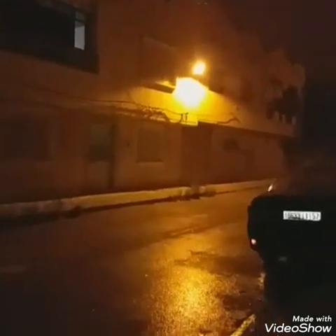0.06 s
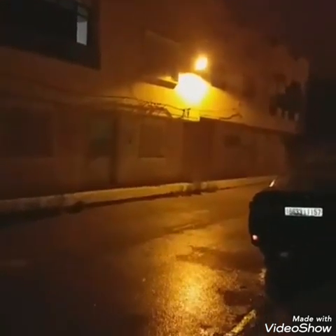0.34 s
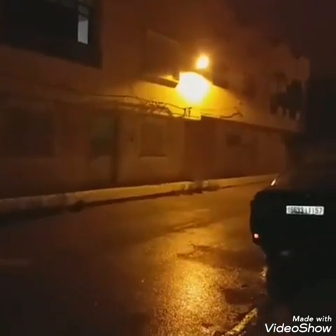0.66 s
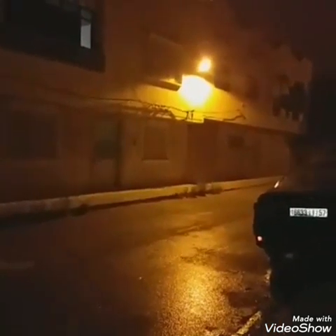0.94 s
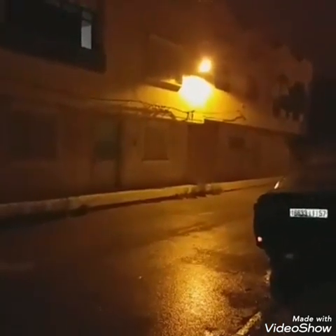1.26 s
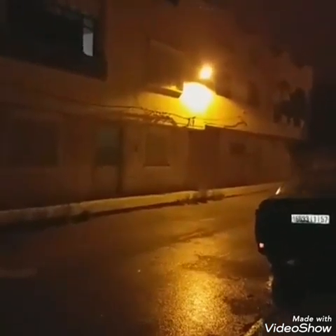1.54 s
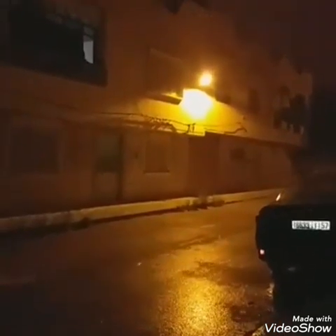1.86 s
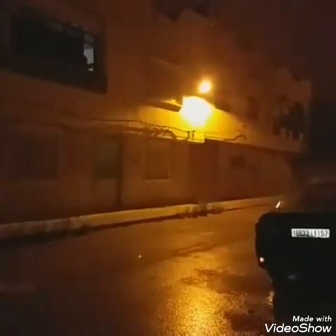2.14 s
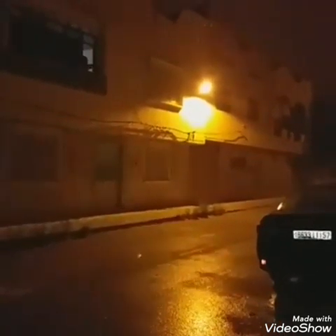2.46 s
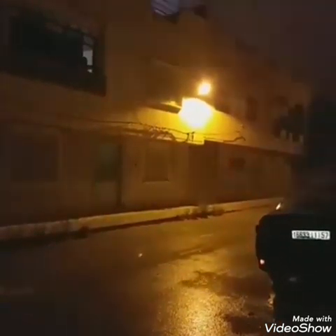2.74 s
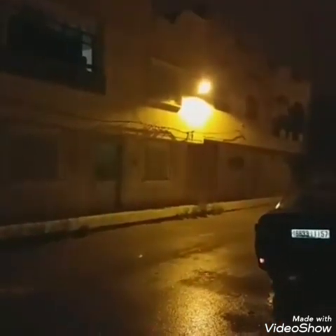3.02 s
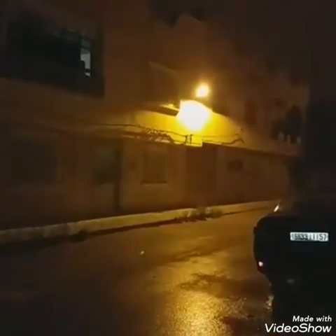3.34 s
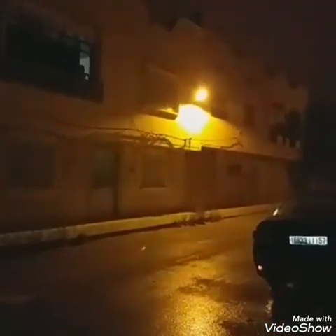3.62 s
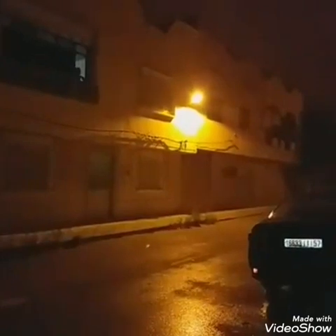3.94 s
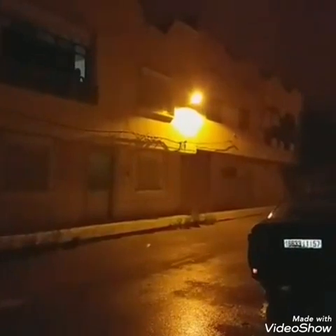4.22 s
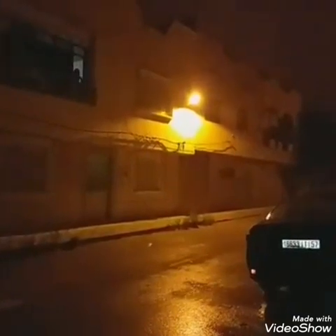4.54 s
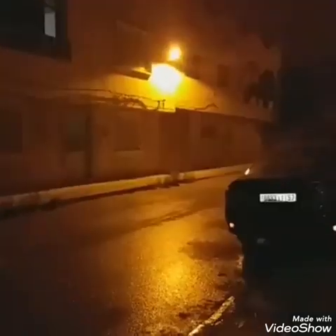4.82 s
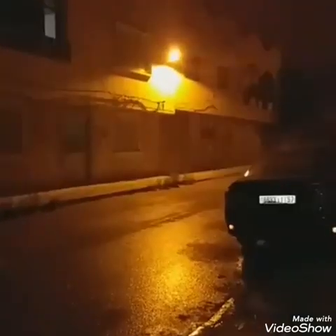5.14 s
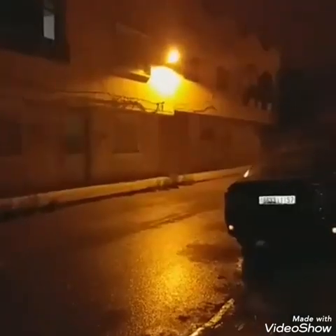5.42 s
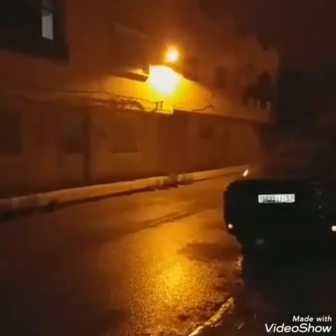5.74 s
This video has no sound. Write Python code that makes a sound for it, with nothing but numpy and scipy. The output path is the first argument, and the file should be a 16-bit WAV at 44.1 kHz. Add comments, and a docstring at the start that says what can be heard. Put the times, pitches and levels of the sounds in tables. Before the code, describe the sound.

A steady downpour on a narrow street, close drips splashing over a low distant rumble, with one brief cut-out near the end.

```python
"""Heavy rain on a narrow street at night, heard from the kerb.
Near drops patter, and fat drips smack, throw spray and plop into puddles, where air bubbles ring.
Countless far drops merge into a wash, water drums on roofs, and distant thunder rolls underneath.
Late on a dull rush swells, the sound cuts out for a moment, then comes back softer with a bright tick."""
import sys
import numpy as np
from scipy import signal
from scipy.fft import rfft, irfft, next_fast_len
from scipy.io import wavfile

SR = 44100
rng = np.random.default_rng(int(sys.argv[2]) if len(sys.argv) > 2 else 0)


def persist_wave(psi):
    """Save psi, clipped to +-1, as 16-bit WAV."""
    counts = np.round(np.clip(psi, -1, 1) * 32767).astype(np.int16)
    wavfile.write(sys.argv[1], SR, np.atleast_2d(counts).T)


N = 254898
TIME = np.arange(N) / SR

# the bright tone of fine spray and ticks: (frequency [Hz], level [dB])
BRIGHT_TONE = [(1500, -10), (4000, 1), (8500, 8.5), (10200, 6.5), (12800, 10), (15800, 0.5)]


def patter():
    """Near raindrops land with sharp ticks and tiny rings over the hiss of their droplets."""
    # the tone of near drops: (frequency [Hz], level [dB])
    patter_tone = [(1200, -27), (2500, -5), (3400, -7.5), (4200, -1.5), (5250, 1), (6200, -0.5), (7400, 1),
                   (8900, -2.5), (9800, -10.5), (10800, -9.5), (11400, -3), (12600, -2), (14000, -6),
                   (15800, -10.5)]
    ticks = undb(-6) * impacts(per_second=2200, scatter_db=2.8, width=.1)
    pings = undb(-7) * ringing_drops(hz=5900, octaves=.48, fade_s=.009, count=3200, scatter_db=3.7)
    # each landing throws up droplets that soon fall back
    landings = np.abs(impacts(per_second=99, scatter_db=3.5, width=0)[0]) ** 2
    settle_s = .018
    droplets = np.sqrt(signal.lfilter([1], [1, -np.exp(-1 / (settle_s * SR))], landings))
    hiss = stereo_noise(side_db=-17) * np.hypot(1, undb(-3) * unit(droplets))
    return shape_tone(hiss + ticks + pings, patter_tone) * undb(wander(45))


def flurries():
    """A changing gain that makes the near rain thicken and thin in short, smooth waves."""
    # flurries (+) and lulls (-): (middle time [s], level change [dB], half length [s])
    waves = [(.12, -2.5, .1), (0.43, -3.5, 0.022), (0.634, -1, 0.055), (1.608, -2.5, .03),
             (1.875, -1, 0.027), (2.06, 1, .025), (2.26, 0.5, 0.029), (2.467, -1, 0.026),
             (2.684, -4.5, .025), (2.81, -2.5, .02), (2.893, 1.5, .03), (3.15, 1, .035),
             (3.388, -4.5, 0.066), (3.568, -3, 0.027), (3.723, -1, 0.032), (3.92, 0.5, .025),
             (4.127, -2.5, 0.13), (4.252, 2, 0.018), (4.5, 2, .09)]
    return undb(sum(db * np.exp(-((TIME - s) / half_length) ** 2) for s, db, half_length in waves))


def spatter():
    """Stray drops of very different sizes tick on the pavement."""
    return undb(-23) * ringing_drops(hz=5600, octaves=.38, fade_s=.0062, count=110, scatter_db=7)


def stray_spray():
    """Small drops shatter all around, each with a fine tick and a puff of mist."""
    ticks = impacts(per_second=45, scatter_db=2.1, width=.15)
    return undb(-12) * shape_tone(add_tail(ticks, fade_s=.03, tail_db=7), BRIGHT_TONE)


def drips():
    """Each fat drip lands with a tick and smacks with a brief ring; its droplets hiss a little longer."""
    # fat drips landing close by: (time [s], level [dB], ring pitch [Hz])
    landings = [(0.0313, -19, 5800), (0.087, -18.5, 5440), (0.228, -17.5, 5400), (0.2788, -14.5, 4870),
                (0.282, -17, 5740), (0.335, -16, 7400), (0.386, -23, 5200), (0.8974, -18, 6250),
                (0.981, -11, 7900), (1.0693, -19.5, 5360), (1.1573, -22, 7300), (1.215, -15.5, 7100),
                (1.553, -10.5, 4850), (1.5618, -22, 4890), (1.569, -18, 5240), (1.6681, -13, 6800),
                (1.7449, -24, 4300), (1.8194, -11.5, 7050), (1.9909, -13.5, 7060), (2.2079, -20, 7660),
                (2.299, -22, 5500), (2.309, -18, 5300), (2.5082, -21, 7800), (2.7013, -19.5, 6900),
                (2.8717, -21.5, 4550), (2.903, -20, 5630), (2.9114, -21.5, 5470), (3.022, -22, 6390),
                (3.123, -18, 7950), (3.485, -24, 4400), (3.511, -15.5, 4940), (3.774, -16.5, 5080),
                (3.8734, -19, 5600), (3.8901, -18, 6100), (3.9033, -17, 6400), (3.921, -14.5, 7200),
                (4.129, -23, 5600), (4.2233, -18, 6560), (4.284, -18, 7170), (4.3137, -10.5, 4950),
                (4.3231, -13, 5450), (4.3295, -23, 4630), (4.34, -19, 5000), (4.4593, -22, 5040),
                (4.561, -19, 5300), (4.668, -18, 5200), (5.2786, -15, 5500), (5.2855, -20, 4500),
                (5.2925, -22, 5000), (5.403, -21, 5330), (5.604, -20, 6260)]
    ring_s, smack_s, droplets_s, flatten_s = .0048, .004, .075, .0003
    out, t = np.zeros((2, N)), TIME[:SR // 12]
    for s, db, hz in landings:
        burst_noise, droplet_noise, tick_noise = rng.standard_normal((3, len(t)))
        ring = np.sin(2 * np.pi * hz * t) * fade(t, ring_s)
        tick = undb(-14) * tick_noise * fade(t, smack_s)
        burst = burst_noise * fade(t, smack_s)
        droplets = undb(-20) * droplet_noise * fade(t, droplets_s)
        around_ring = signal.butter(2, [hz * .57, hz * 1.26], "band", fs=SR)
        smack = ring + tick + undb(-1) * signal.lfilter(*around_ring, burst + droplets)
        smack *= 1 - np.exp(-t / flatten_s)  # the sound builds as the drop flattens
        smack *= undb(db) / np.abs(smack).max()
        place(out, s + .001194, smack, pan=.033 * rng.standard_normal())
        # the nearest wall returns it as a quick slap
        place(out, s + .0096, undb(-14) * smack, pan=.1 * rng.standard_normal())
    return out


def splashes():
    """The heaviest drips throw up a crown of water that falls back with a soft, wet splat."""
    # wet splats: (time [s], level [dB], length [s])
    splats = [(1.0, -40, .012), (1.54, -35, .02), (1.985, -35, .014), (2.297, -37, .012),
              (3.49, -37, 0.018), (3.885, -37, 0.028), (4.316, -29.5, 0.014), (5.28, -35, .011)]
    # the tone of a splat: (frequency [Hz], level [dB])
    splat_tone = [(900, -22), (2000, -7), (3300, -3.5), (4800, 2), (7000, -3.5), (9000, -7), (15000, -24.5)]
    falling_water = impacts(per_second=6000, scatter_db=-1.5, width=.1)
    return bursts(splats) * shape_tone(falling_water, splat_tone)


def plops():
    """Big drips fall into the nearest puddles: a bubble rings very briefly inside a hollow splash."""
    # drips into puddles: (time [s], level [dB], bubble pitch [Hz])
    puddle_drips = [(0.1078, -25, 1830), (0.155, -27, 1940), (0.553, -24.5, 1710), (1.06, -25, 1110),
                    (2.289, -22.5, 1940), (2.3018, -22, 1960), (2.5242, -24, 1920), (4.314, -30, 2180),
                    (4.323, -28, 2250), (5.354, -25, 2180), (5.4632, -24, 1920)]
    rise_s, ring_s = .0012, .012
    out, t = np.zeros((2, N)), TIME[:int(ring_s * SR)]
    envelope = (1 - np.exp(-(t / rise_s) ** 2)) * fade(t, ring_s)
    for s, db, hz in puddle_drips:
        around_bubble = signal.butter(2, [hz * .75, hz * 1.4], "band", fs=SR)
        splash = unit(signal.lfilter(*around_bubble, rng.standard_normal(SR // 10)))[:len(t)]
        plop = (np.sin(2 * np.pi * hz * t) + undb(-10) * splash) * envelope
        place(out, s, undb(db) * plop / np.abs(plop).max(), pan=.22 * rng.standard_normal())
    return out


def sprays_and_tick():
    """Bright bursts: spray from shattered drips, and one brief tick as the sound cuts back in."""
    # bright bursts (the one at 4.89 s is the tick after the gap): (time [s], level [dB], length [s])
    bright_bursts = [(0.185, -26, 0.016), (0.458, -27, 0.006), (0.517, -25.5, 0.014), (0.73, -27.5, 0.043),
                     (0.793, -24.5, 0.05), (0.839, -20.5, 0.02), (0.943, -23, 0.016), (1.538, -23, 0.02),
                     (1.559, -26.5, 0.014), (1.785, -24, 0.018), (2.501, -24, 0.012), (3.022, -28.5, 0.012),
                     (3.119, -30, 0.012), (3.232, -27.5, 0.012), (3.363, -30, 0.011), (3.479, -27.5, 0.014),
                     (3.504, -22, 0.021), (3.692, -27, 0.018), (3.772, -25, 0.011), (4.371, -30, 0.01),
                     (4.455, -28, 0.011), (4.89, -29, 0.022), (5.276, -24, 0.0055), (5.611, -24, 0.011)]
    fizz = impacts(per_second=4900, scatter_db=1, width=.11)
    return undb(-6.5) * bursts(bright_bursts) * shape_tone(fizz, BRIGHT_TONE)


def wash():
    """Rain all down the street merges into a smooth rush with a faint grain of drops on stone."""
    # the tone of far rain: (frequency [Hz], level [dB])
    wash_tone = [(300, -33), (600, -11.5), (810, -10.5), (880, -3.5), (980, -4), (1120, 1), (1280, -2),
                 (1480, -3), (1900, 0.5), (2300, -3), (2800, -5), (4000, -6.5), (6000, -12.5),
                 (9000, -17.5), (16000, -32)]
    rush = stereo_noise(side_db=-25)
    grain = undb(-5) * impacts(per_second=900, scatter_db=2.5, width=.027)
    return shape_tone(rush + grain, wash_tone) * undb(.5 * wander(12))


def puddles():
    """Bubbles of about one size plink all over the wet street."""
    return undb(-7) * ringing_drops(hz=1954, octaves=.203, fade_s=.06, count=900, scatter_db=1)


def roofs():
    """Water drums on roofs and runs in gutters, dull and restless."""
    # the low tone of roofs and gutters: (frequency [Hz], level [dB])
    roof_tone = [(30, -41), (90, -13), (140, -7), (185, 1), (235, -2), (290, 0), (340, -0.5), (410, 1.5),
                 (470, 0.5), (520, 2), (620, -3), (900, -6), (3000, -38.5)]
    return shape_tone(stereo_noise(side_db=-27), roof_tone) * undb(1.6 * wander(20))


def thunder():
    """Far thunder rolls unevenly, dulled by distance, with a few stronger thumps of air pressure."""
    # rolls that swell fast and die slowly: (peak time [s], level [dB], dying time [s])
    rolls = [(.85, -58, .4), (1.4, -63, 0.33), (2.23, -51, 0.45), (2.85, -51, 0.5), (3.25, -50, 0.69),
             (3.78, -46.5, 0.074), (4.43, -61, 0.29)]
    # the deep tone of the rolls: (frequency [Hz], level [dB])
    thunder_tone = [(20, -18), (35, -16), (55, -6), (80, -2.5), (125, 1), (190, -2), (300, -8),
                    (500, -23.5), (800, -41)]
    # low thumps: (time [s], level [dB], pitch [Hz], length [s])
    pulses = [(1.297, -49.5, 143, 0.037), (1.979, -35, 125, 0.015), (2.234, -44, 82, 0.044),
              (3.045, -47.5, 98, 0.041), (3.26, -53, 80, 0.04), (3.72, -48, 172, 0.036),
              (3.79, -51.5, 80, 0.042), (4.43, -55, 75, 0.035), (4.65, -56, 100, 0.04)]
    rumble_db, rise_s = -63, .06
    power = undb(rumble_db) ** 2
    for s, db, fall_s in rolls:
        power += (undb(db) * rise_and_fall(s, rise_s, fall_s)) ** 2
    rumble = shape_tone(stereo_noise(side_db=-37), thunder_tone)
    roll = rumble * np.sqrt(power) * undb(2.1 * wander(14))
    thumps = np.zeros(N)
    for s, db, hz, length in pulses:
        # pulses of three pitches arrive almost together from the lightning's crooked path
        for ratio in (2 ** -.5, 1, 2 ** .6):
            age = TIME - s - .0056 * rng.standard_normal()
            envelope = undb(db) * np.exp(-(2 * age / length) ** 2)
            thumps += envelope * np.sin(2 * np.pi * (hz * ratio * age + rng.random()))
    low_cut = signal.butter(3, 62, "high", fs=SR, output="sos")
    return roll + signal.sosfilt(low_cut, thumps)


def swell():
    """A short, dull rush grows just before the sound cuts out."""
    # the tone of the rush: (frequency [Hz], level [dB])
    swell_tone = [(150, -28), (300, -6), (430, 9), (650, -5.5), (1250, -1), (2500, -17), (6000, -47.5)]
    rush = shape_tone(stereo_noise(side_db=-25), swell_tone)
    return undb(-36) * rush * rise_and_fall(peak_s=4.705, rise_s=.064, fall_s=.064)


def impacts(per_second, scatter_db, width):
    """Clicks at random moments, like drops hitting; their sizes vary, and width spreads them sideways."""
    size = undb(scatter_db * np.minimum(rng.exponential(size=N), 5))
    hits = (rng.random(N) < per_second / SR) * size * rng.choice([-1, 1], N)
    sides = 1 + width * rng.standard_normal(N) * np.array([[1], [-1]])
    return unit(hits * sides)


def ringing_drops(hz, octaves, fade_s, count, scatter_db):
    """Drops at random moments each trap an air bubble, which rings briefly and rises a little in pitch."""
    out, t = np.zeros((2, N)), TIME[:int(fade_s * SR)]
    times = rng.random(count) * N / SR
    for s, (pitch, size, side) in zip(times, rng.standard_normal((count, 3))):
        bubble_hz = min(hz * 2 ** (octaves * pitch), SR / 3)
        ring = np.sin(2 * np.pi * bubble_hz * t * (1 + .87 * t)) * fade(t, fade_s)
        place(out, s, undb(scatter_db * min(size, 2)) * ring, pan=side / 5)
    return unit(out)


def undb(db):
    """Turn decibels into a gain to multiply by."""
    return 10 ** (np.asarray(db) / 20)


def unit(x):
    """Scale a sound to an average (rms) strength of 1."""
    return x / np.sqrt(np.mean(x ** 2))


def fade(t, fade_s):
    """A gain that drops by 60 dB in fade_s seconds."""
    return undb(-60 * t / fade_s)


def rise_and_fall(peak_s, rise_s, fall_s):
    """A gain that swells to 1 at peak_s and dies away."""
    return np.exp(-np.maximum((peak_s - TIME) / rise_s, (TIME - peak_s) / fall_s))


def bursts(table):
    """A gain that swells quickly and thins out for each row of (time [s], level [dB], length [s])."""
    envelope = np.zeros(N)
    for s, db, length in table:
        age = np.maximum(TIME - s, 0) / (length / 3)
        envelope += undb(db) * age * np.exp(1 - np.minimum(age, 60))
    return envelope


def wander(per_second):
    """A slow wobble that glides between random values, mostly within -1 to 1."""
    return np.interp(TIME * per_second, np.arange(4096), rng.standard_normal(4096))


def stereo_noise(side_db):
    """Noise that is nearly alike in both ears; side_db sets how much they differ."""
    mid, side = rng.standard_normal((2, N))
    return mid + undb(side_db) * side * np.array([[1], [-1]])


def shape_tone(x, points):
    """Filter a sound through points of (frequency [Hz], level [dB]), then scale it to strength 1."""
    hz, db = np.transpose(points)
    size = next_fast_len(N + 4096, True) // 2 * 2
    grid_hz = np.maximum(np.fft.rfftfreq(size, 1 / SR), 1)
    gains = undb(np.interp(np.log(grid_hz), np.log(hz), db))
    # fold the filter's second half onto its first, so it rings only after each hit, never before
    folded = irfft(np.log(gains))
    folded[1:size // 2] *= 2
    folded[size // 2 + 1:] = 0
    response = np.exp(rfft(folded))
    return unit(irfft(rfft(x, size) * response)[..., :N])


def add_tail(x, fade_s, tail_db):
    """Follow each impact with a short noisy tail."""
    t = TIME[:SR // 4]
    response = fade(t, fade_s) * rng.standard_normal(len(t))
    response *= undb(tail_db) / np.linalg.norm(response)
    response[0] = 1  # the impact itself
    return signal.fftconvolve(x, response[None], axes=1)[:, :N]


def place(out, s, sound, pan):
    """Mix a short sound in at s seconds; a positive pan moves it left."""
    start = max(int(s * SR), 0)
    part = sound[:max(N - start, 0)]
    out[:, start:start + len(part)] += part * np.array([[1 + pan], [1 - pan]])


def scene():
    """Rain near and far, with the thunder underneath."""
    # one slow surge of rain that eases off: (time [s], far level [dB], near level [dB], roof level [dB])
    rain_strength = [(0, -36.5, -33, -43), (0.7, -37.5, -34, -43), (1.1, -36, -32.5, -43),
                     (1.7, -36, -33.5, -42.5), (2.1, -36.5, -33, -41.5), (2.7, -37, -35.5, -42.5),
                     (3.1, -37.5, -35, -43), (4.1, -38.5, -34, -44.5), (4.6, -37, -37, -43),
                     (5.1, -37.5, -38, -45.5), (5.78, -39, -39, -45)]
    times, *levels = np.transpose(rain_strength)
    far_db, near_db, roof_db = [np.interp(TIME, times, level) for level in levels]
    far = (puddles() + wash()) * undb(far_db)
    near = (patter() + spatter() + stray_spray()) * undb(near_db) * flurries()
    rain = far + near + roofs() * undb(roof_db)
    # the house fronts throw the close drips back
    close = add_tail(drips() + splashes() + plops() + sprays_and_tick(), fade_s=.15, tail_db=-12)
    return rain + close + thunder() + swell()


def record(dry):
    """The sound cuts out briefly, returns softer and creeps back up; the highest treble is removed."""
    # the gap: (fade-out start [s], silence start [s], silence end [s], fade-in end [s])
    gap_times = (4.724, 4.742, 4.887, 4.890)
    return_db, recovery_s, top_hz = -7, .26, 15900
    gap = np.interp(TIME, gap_times, [1, 0, 0, 1])
    since_gap = TIME - gap_times[2]
    recovery = undb(return_db * (since_gap > 0) * np.exp(-np.abs(since_gap) / recovery_s))
    treble_cut = signal.ellip(12, .1, 80, top_hz, fs=SR, output="sos")
    return signal.sosfilt(treble_cut, dry * gap * recovery)


dry = scene()
out = record(dry)
persist_wave(out)
```